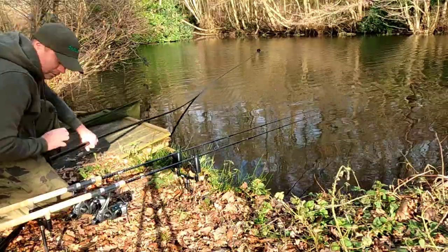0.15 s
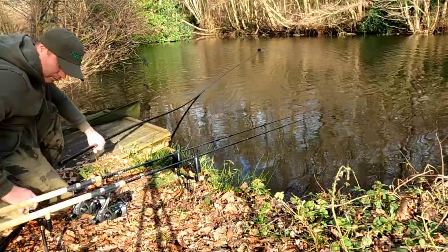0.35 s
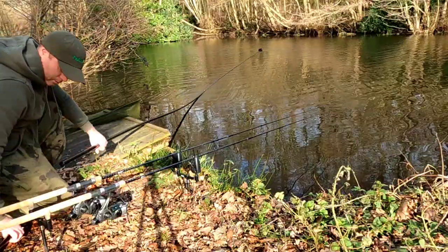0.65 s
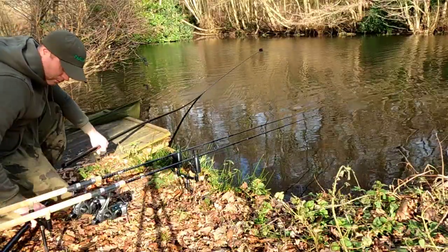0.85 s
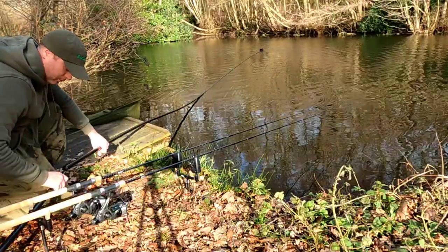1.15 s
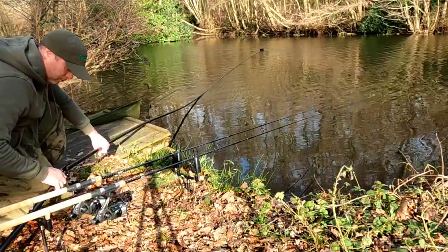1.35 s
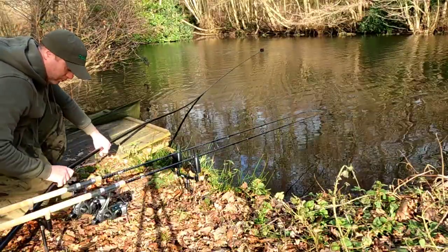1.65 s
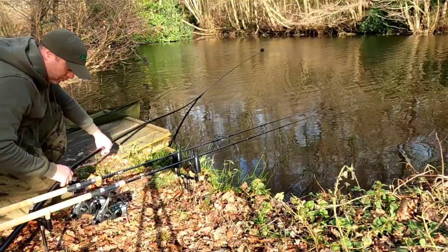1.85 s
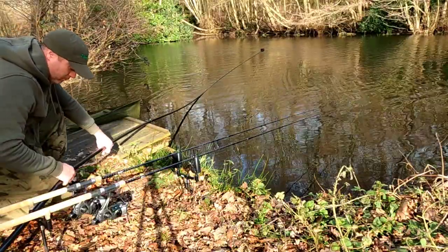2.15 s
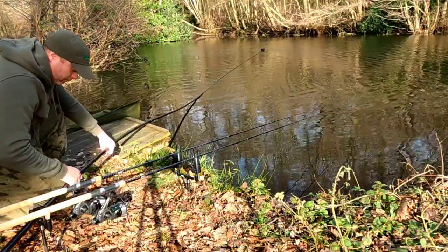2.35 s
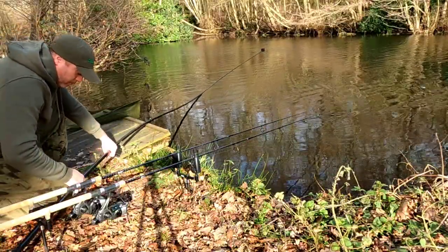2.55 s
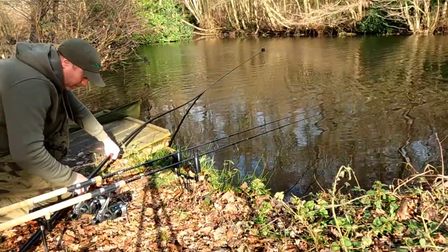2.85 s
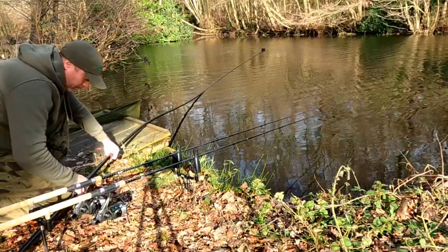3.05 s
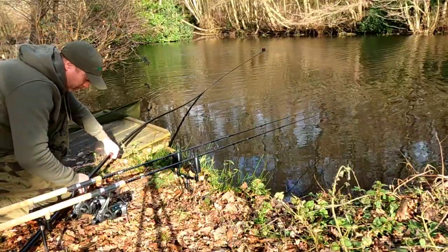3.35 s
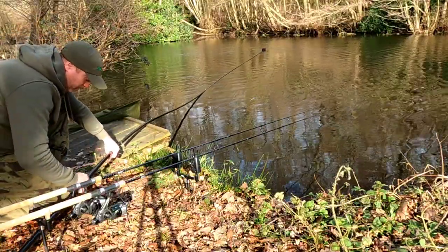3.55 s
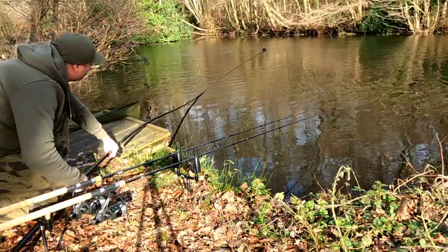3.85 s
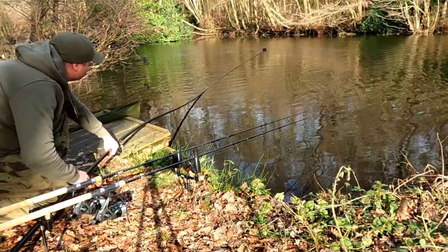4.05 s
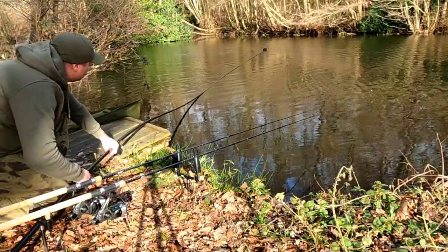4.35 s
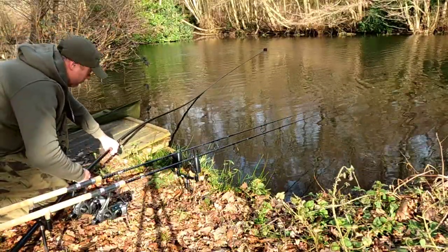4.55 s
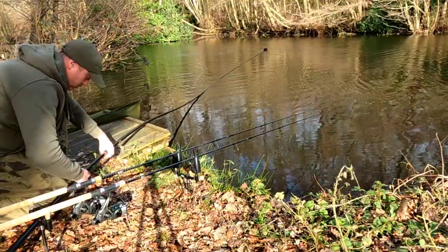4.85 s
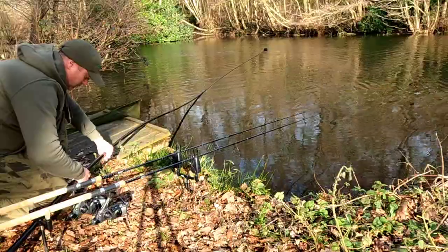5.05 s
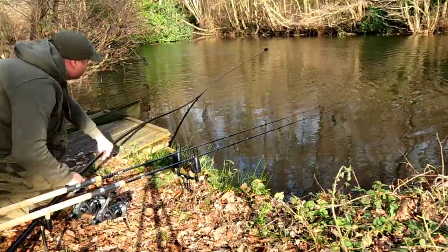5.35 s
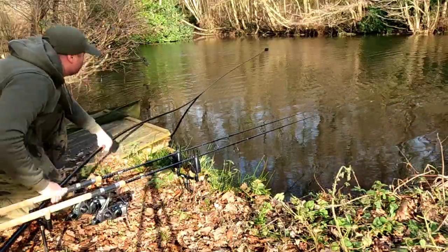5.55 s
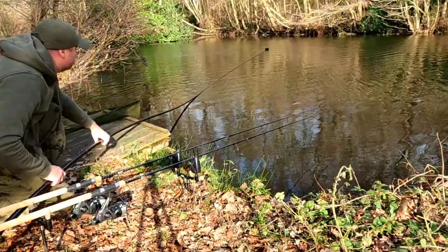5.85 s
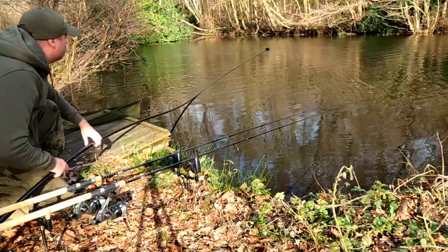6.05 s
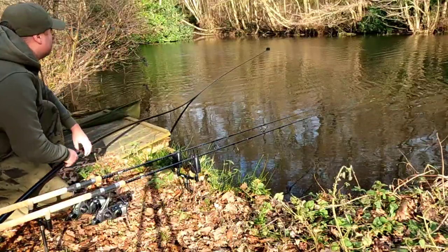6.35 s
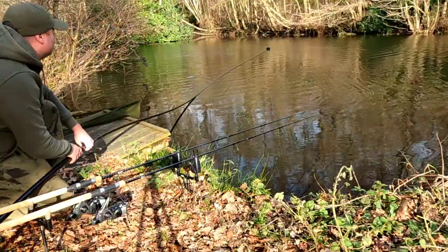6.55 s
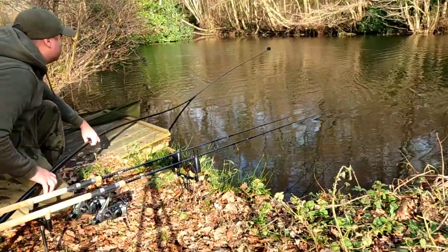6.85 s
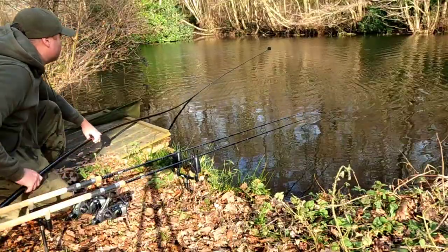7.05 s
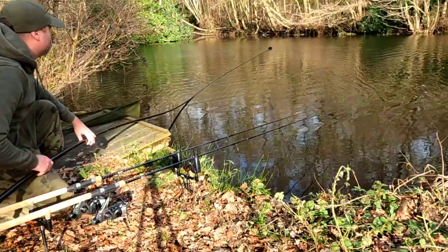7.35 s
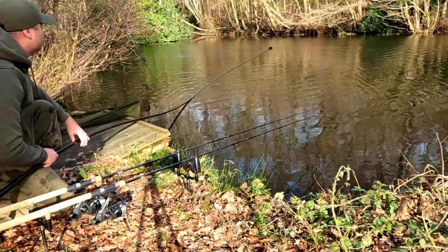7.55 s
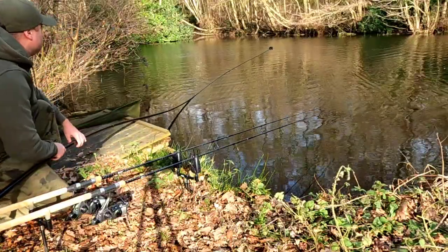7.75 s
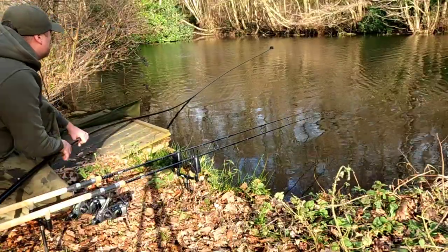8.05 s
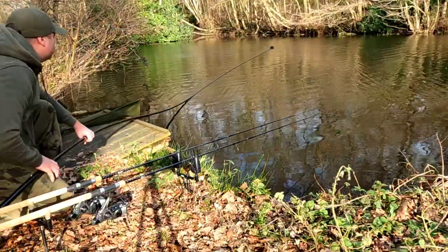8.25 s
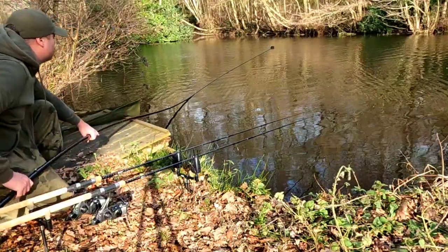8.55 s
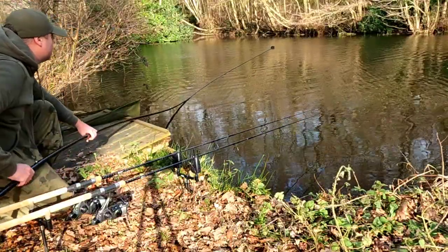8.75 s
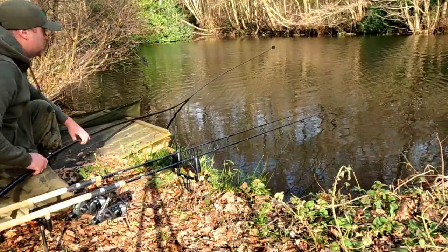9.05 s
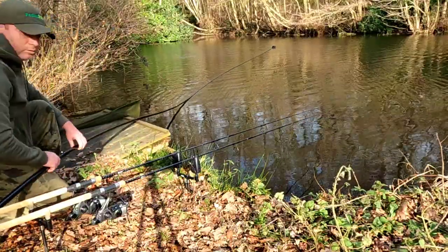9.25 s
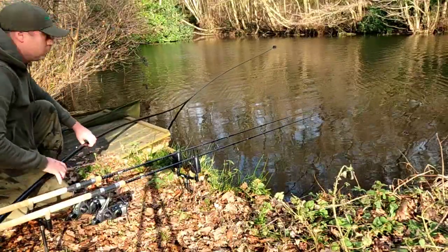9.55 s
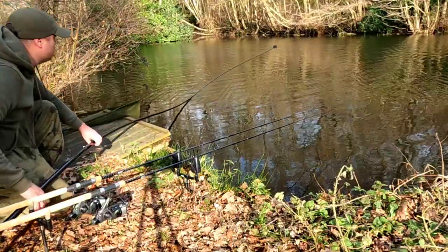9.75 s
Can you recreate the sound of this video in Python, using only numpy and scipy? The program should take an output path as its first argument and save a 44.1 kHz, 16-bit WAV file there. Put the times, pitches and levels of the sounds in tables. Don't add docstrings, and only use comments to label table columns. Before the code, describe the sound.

A close handling scene on a lake bank: soft fabric rustle and tiny dry snaps, then several hard hollow knocks and a brief crunch as a pole is set. High birds chirp downward in short series, near at first, later distant and echoing. Bassy wind flutter bumps the unshielded microphone, strongest after six seconds, over smooth distant hiss.

```python
import sys
import numpy as np
from scipy import signal
from scipy.fft import rfft, irfft, next_fast_len
from scipy.io import wavfile
from scipy.ndimage import uniform_filter1d, map_coordinates

SR = 44100
rng = np.random.default_rng(int(sys.argv[2]) if len(sys.argv) > 2 else 0)


def put_to_file(sound):
    columns = np.atleast_2d(sound).T
    safe = np.clip(columns, -1, 1)
    whole_steps = np.round(safe * 32767)
    wavfile.write(sys.argv[1], SR, whole_steps.astype(np.int16))


def gain_from_decibels(decibels):
    exponent = np.asarray(decibels, float) / 20
    return 10 ** exponent


N = 437031


def unit(x):
    return x / np.sqrt(np.mean(x ** 2) + 1e-20)


def curves(rows):
    seconds, *columns = np.transpose(rows)
    return [np.interp(np.arange(N) / SR, seconds, column) for column in columns]


def wobble(rate):
    points = rng.standard_normal(int(N * rate / SR) + 4)
    return map_coordinates(points, [np.arange(N) * rate / SR])


def coloured(x, spectrum):
    size = next_fast_len(N + 8192)
    hz, db = np.transpose(spectrum)
    log_hz = np.log(np.fft.rfftfreq(size, 1 / SR) + 0.26)
    gain = gain_from_decibels(np.interp(log_hz, np.log(hz), db))
    return unit(irfft(rfft(x, size) * gain, size)[:N])


def band(x, low_hz, high_hz, order=2):
    return signal.sosfilt(signal.butter(order, [low_hz, high_hz], "band", fs=SR, output="sos"), x)


def add(track, s, sound):
    part = track[round(s * SR):][:len(sound)]
    part += sound[:len(part)]


def decay(t, t60, rise_s):
    return gain_from_decibels(-60 * t / t60) * (1 - np.exp(-t / rise_s))


# peak in seconds, half length in seconds, slow push in dB, flutter in dB.
GUSTS = [(0.526, 0.08, -29, -54.5), (1.115, 0.14, -30, -55), (1.706, 0.13, -27, -44.5),
         (1.943, 0.085, -27, -43), (2.294, 0.2, -25.5, -47), (2.747, 0.21, -34.5, -46.5),
         (3.018, 0.23, -33.5, -60), (3.497, 0.1, -37, -49), (3.74, 0.16, -32.5, -44.5),
         (3.98, 0.15, -26.5, -63), (4.394, 0.14, -44, -72), (5.255, 0.072, -35, -61),
         (5.556, 0.3, -36.5, -51.5), (5.912, 0.21, -23.5, -43.5), (6.115, 0.043, -31, -46),
         (6.406, .13, -19, -39.5), (6.765, 0.23, -24.5, -48), (7.163, 0.19, -26, -49),
         (7.497, 0.04, -19.5, -53), (7.703, 0.12, -23, -42), (7.966, 0.051, -20, -42),
         (8.13, 0.087, -24, -40), (8.565, 0.3, -34, -46.5), (8.86, 0.13, -21, -44.5),
         (9.04, 0.11, -25, -56), (9.314, 0.2, -37, -52), (9.764, 0.068, -25.5, -52)]
CALM_PUSH_DB, CALM_FLUTTER_DB = -43, -64


def gusts():
    t = np.arange(N) / SR
    power = np.outer(gain_from_decibels([CALM_PUSH_DB, CALM_FLUTTER_DB]) ** 2, np.ones(N))
    for s, half, *db in GUSTS:
        bell = np.exp(-2 * ((t - s) / half) ** 2)
        power += np.outer(gain_from_decibels(db) ** 2, bell)
    return np.sqrt(power)


# pitch in Hz, level in dB per Hz.
PUSH = [(1, 14.5), (3, 11), (9, 9.5), (18, -7), (26, -35), (40, -77.5), (80, -130)]
# pitch in Hz, level in dB per Hz.
FLUTTER = [(12, -37), (22, 0.5), (43, -12.5), (90, -28), (200, -50), (400, -99), (800, -130)]


def wind(top=0.27):
    push_gain, flutter_gain = gusts()
    heave = coloured(rng.standard_normal(N), PUSH)
    heave_size = np.sqrt(np.abs(uniform_filter1d(heave ** 2, size=SR // 5)))
    push = push_gain * unit(heave / (0.5 + heave_size))
    lumps = gain_from_decibels(0.9 * wobble(6.6))
    flutter = flutter_gain * unit(lumps * coloured(rng.standard_normal(N), FLUTTER))
    return top * np.tanh(push / top) + flutter


# time in seconds, level in dB.
DRIFT = [(0, -54), (3.4, -53.5), (5, -54.5), (9.91, -55)]
# pitch in Hz, level in dB per Hz.
FAR = [(29, -49), (50, -0.5), (54, -11.5), (65, -6), (244, -12.5), (325, -13.5), (652, -9.5), (957, -12.5),
       (2330, -22.5), (3420, -22.5), (4450, -35.5), (5930, -30.5), (9360, -48), (14400, -48.5),
       (15500, -45)]


def distance():
    level_db, = curves(DRIFT)
    breathing_db = 0.3 * wobble(3.5)
    return gain_from_decibels(level_db + 1.5 + breathing_db) * coloured(rng.standard_normal(N), FAR)


# start in seconds, length in seconds, level, body and sheen in dB.
RUBBING = [(0.714, 0.67, -76.5, 4, 1), (0.94, 0.55, -62, -2.5, -2), (1.454, .17, -67, 0, -2),
           (1.71, 0.14, -68, -3, -6), (1.8, 1.4, -73.5, -9, -16), (4.08, 0.12, -76, -3, -6),
           (5.38, 0.45, -70.5, -17, -2), (5.62, 0.36, -69, -5, -2), (6.16, 0.1, -71.5, -6, -4),
           (6.417, 0.46, -69, -12, -4), (6.9, 0.73, -76.5, -12, -2), (7.58, 0.34, -68, -9, -2),
           (7.878, 0.11, -68, -11, -3), (8.25, 0.37, -76, -8, 2), (9.03, .2, -68.5, -8, 2),
           (9.2, .9, -74.5, -8, 1)]
# level, body and sheen in dB.
GRIP = (-76, -9, 2.5)
STROKE_FADE = 0.75


def strokes():
    def powers(db, body_db, sheen_db):
        return gain_from_decibels([db, db + body_db, db + sheen_db]) ** 2

    power = np.outer(powers(*GRIP), np.ones(N))
    for s, length, *levels in RUBBING:
        speed = signal.windows.tukey(int(length * SR), STROKE_FADE)
        for layer, gain in zip(power, powers(*levels)):
            add(layer, s, gain * speed ** 2)
    return np.sqrt(power)


# pitch in Hz, level in dB per Hz.
CLOTH = [(900, -49), (2000, -9), (3400, -4), (4500, -14), (6000, 1), (7600, -2.5), (9600, -14.5),
         (12000, -17), (15500, -26)]


def rubbing(density=0.2):
    middle, body, sheen = strokes()
    slips = rng.standard_normal(N) * (rng.random(N) < density)
    clumps = gain_from_decibels(1.3 * wobble(50) + 1.2 * wobble(250))
    hiss = coloured(slips, CLOTH) * clumps
    layers = middle * band(hiss, 4850, 9130, order=3)
    layers += body * gain_from_decibels(7.0) * band(hiss, 900, 4050, order=3)
    layers += sheen * band(hiss, 8530, 15600, order=3)
    return gain_from_decibels(4.0) * layers


def sing(track, s, pitch, level, waver, echo_db, t60):
    t = np.arange(SR // 2) / SR
    knots = rng.standard_normal((2, 40))
    shake, flicker = (map_coordinates(k, [np.arange(len(pitch)) * 110 / SR]) for k in knots)
    shaken_hz = pitch * (1 + 0.0049 * waver * shake)
    note = level * np.sin(2 * np.pi * np.cumsum(shaken_hz) / SR)
    tail = rng.standard_normal(len(t)) * decay(t, t60, 0.0053)
    add(track, s, note * gain_from_decibels(2.0 * waver * flicker))
    add(track, s, gain_from_decibels(echo_db) * signal.fftconvolve(note, tail / np.linalg.norm(tail)))


def birds(notes, gain_db, bend, swell, waver, echo_db, t60):
    track = np.zeros(N)
    for s, length, start_hz, end_hz, db in notes:
        u = np.linspace(0, 1, int(length * SR) + 8)
        pitch = end_hz + (start_hz - end_hz) * (1 - u) ** bend
        envelope = np.clip(np.sin(np.pi * u ** swell), 0, 1) ** 0.34
        sing(track, s, pitch, gain_from_decibels(db + gain_db) * envelope, waver, echo_db, t60)
    return track


# start in seconds, length in seconds, start pitch in Hz, end pitch in Hz, level in dB.
OTHERS = [(.231, 0.026, 5750, 5920, -81), (.381, 0.052, 6480, 6050, -76), (.589, 0.047, 6500, 6100, -73),
          (1.563, 0.056, 7430, 6850, -71), (1.745, 0.051, 7270, 6760, -75), (1.901, 0.055, 6800, 7040, -72),
          (2.078, .049, 6920, 6700, -78), (2.442, .037, 7060, 6780, -78), (2.637, 0.043, 7100, 6750, -74),
          (4.31, .109, 8470, 8500, -87), (4.396, .092, 8260, 8100, -87), (4.545, 0.09, 8000, 7000, -79),
          (7.005, 0.079, 3360, 3394, -74), (7.128, 0.029, 3260, 3870, -66.5),
          (7.175, 0.037, 3830, 3720, -66), (7.249, .156, 8530, 8240, -84), (7.352, 0.079, 4270, 4000, -74),
          (8.122, 0.035, 6300, 5930, -73), (9.31, .23, 8170, 7140, -87)]


def other_birds():
    return birds(OTHERS, gain_db=9.5, bend=1.2, swell=1.0, waver=1.57, echo_db=-5.5, t60=0.44)


# time in seconds, peak in dB, centre pitch in Hz.
SNAPS = [(0.9194, -51, 6680), (1.073, -53, 6890), (1.1917, -44, 6880), (1.2307, -43, 6790),
         (1.292, -43, 6750), (1.4073, -41.5, 6400), (1.5664, -50, 7260), (1.775, -51, 7110),
         (3.2064, -58, 8310), (4.1275, -55, 7100), (4.6084, -42.5, 6700), (4.8294, -51, 7600),
         (4.951, -43, 7030), (5.6516, -60, 7910), (5.9908, -54, 6790), (6.448, -46, 6950),
         (6.4941, -49, 6650), (6.538, -47, 6930), (6.5794, -48, 6940), (6.6159, -55, 8280),
         (6.6667, -42, 6700), (6.7421, -56, 6600), (6.8447, -45, 6700), (7.8394, -49.5, 7840),
         (7.935, -48, 6830), (8.8947, -53, 8120), (8.9815, -50, 7960), (9.1716, -52, 6680),
         (9.437, -60, 6990), (9.5113, -48, 7190)]


def snaps(t60=0.0022):
    track, t = np.zeros(N), np.arange(SR // 50) / SR
    for s, db, hz in SNAPS:
        puff = rng.standard_normal(len(t)) * decay(t, t60, 0.00022)
        burst = band(puff, hz / 1.1, hz * 1.28)
        add(track, s, gain_from_decibels(db + 1.5) * burst / np.abs(burst).max())
    return track


# start in seconds, length in seconds, start pitch in Hz, end pitch in Hz, level in dB.
NEAR = [
    (1.626, .05, 6330, 5300, -58),
    (1.787, 0.049, 6150, 5200, -56.5),
    (1.95, 0.047, 6200, 5190, -54.5),
    (2.112, 0.06, 6250, 4980, -53.5),
    (2.284, 0.081, 6300, 5050, -58),
    (2.412, 0.088, 6150, 5120, -59.5),
    (2.486, 0.069, 6100, 5040, -56),
    (2.683, 0.066, 6050, 5010, -56),
]


def nearest_bird():
    return birds(NEAR, gain_db=2.5, bend=1.95, swell=1.2, waver=1.5, echo_db=-2, t60=0.7)


# start in seconds, length in seconds, start pitch in Hz, end pitch in Hz, level in dB.
HAZY = [(1.93, 0.054, 8300, 7900, -76), (2.12, .07, 8600, 7700, -83), (2.29, .06, 8600, 7700, -88),
        (2.572, 0.06, 5700, 5210, -62), (2.55, .07, 8800, 8400, -79), (2.85, .08, 8500, 8250, -82),
        (5.35, 0.17, 8700, 7200, -73.5), (5.53, .13, 7800, 7500, -73), (5.86, .087, 5370, 5130, -69),
        (5.95, .081, 5600, 5090, -66), (6.04, 0.12, 5470, 5050, -72), (9.12, .03, 6500, 6200, -80),
        (9.23, .13, 2500, 2290, -67.5), (9.526, 0.061, 5890, 5240, -65.5), (9.69, 0.081, 5800, 5330, -65),
        (9.83, .065, 5460, 5320, -73)]


def hazy_birds():
    return birds(HAZY, gain_db=-10, bend=1.3, swell=0.9, waver=3.5, echo_db=13, t60=0.5)


# time in seconds, peak in dB, pitch in Hz, sharpness, crack in dB.
KNOCKS = [
    (2.136, -37.5, 3120, 4.7, -16),
    (2.999, -32, 3140, 6, -14),
    (3.229, -33, 2800, 2.5, -26),
    (3.5203, -29, 2890, 1.54, -20),
    (5.8326, -47, 2190, 4, -20),
    (6.026, -45, 3800, 2, -5),
    (7.236, -48, 4900, 4, -14),
    (9.596, -47, 3400, 3.5, -8),
    (9.7772, -38.5, 3680, 4.9, 1),
    (9.782, -45, 2100, 8.4, -30),
]


def knocks(t60=0.0082):
    track, t = np.zeros(N), np.arange(SR // 20) / SR
    for s, db, hz, sharpness, crack_db in KNOCKS:
        puff = rng.standard_normal((2, len(t))) * decay(t, t60, 0.00051)
        spread = 1 + 1 / sharpness
        ring = band(puff[0], hz / spread, hz * spread)
        crack = band(puff[1], 4800, 9500, order=3)
        blow = ring / np.abs(ring).max() + gain_from_decibels(crack_db + 1.0) * crack / np.abs(crack).max()
        add(track, s, gain_from_decibels(db) * blow)
    return track


def shadow(x, notch_hz=4300, width_hz=700, depth=0.6):
    b, a = signal.iirpeak(notch_hz, notch_hz / width_hz, fs=SR)
    return band(x - depth * signal.lfilter(b, a, x), 870, 7300)


# start in seconds, length in seconds, start pitch in Hz, end pitch in Hz, level in dB.
SLURS = [
    (2.585, 0.15, 8100, 7320, -68),
    (2.812, 0.19, 8400, 6960, -68.5),
]


def slurring_bird():
    return birds(SLURS, gain_db=0, bend=3, swell=1.2, waver=1.5, echo_db=1, t60=0.6)


# start in seconds, length in seconds, level in dB.
CRUNCH = [
    (3.002, .022, -60),
    (3.22, .038, -49.5),
]
# pitch in Hz, level in dB.
POLE = [(1200, -15), (2130, -6), (2730, -1), (3340, -6), (4300, -12), (4800, -7), (5790, -6), (7000, -25),
        (9000, -26), (12000, -60), (16000, -90)]


def crunch():
    grains = rng.standard_normal(N) * (rng.random(N) < 0.07)
    grit, track = coloured(grains, POLE), np.zeros(N)
    for s, length, db in CRUNCH:
        window = signal.windows.tukey(int(length * SR), 0.4)
        add(track, s, gain_from_decibels(db) * window * grit[round(s * SR):][:len(window)])
    return track


# start in seconds, length in seconds, start pitch in Hz, end pitch in Hz, level in dB.
STEPPED = [
    (3.021, .034, 6150, 5000, -57),
    (3.062, .06, 5500, 5050, -57.6),
    (3.197, .028, 6100, 5000, -57.4),
    (3.228, .068, 5400, 4600, -57.5),
]


def stepping_bird():
    return birds(STEPPED, gain_db=2.5, bend=0.28, swell=0.9, waver=1.1, echo_db=-4, t60=0.7)


# time in seconds, peak in dB.
CLACK = (3.5208, -30)
# pitch in Hz, level in dB, time to fade by 60 dB in seconds.
TUBE = [(2110, -4, 0.018), (2750, -3, 0.017), (3360, 6, 0.008), (4680, -3, 0.01), (5740, -8, 0.01),
        (8300, -25, .012)]


def clack():
    track, t = np.zeros(N), np.arange(SR // 20) / SR
    ring = np.zeros(len(t))
    for hz, db, t60 in TUBE:
        ring += gain_from_decibels(db - 60 * t / t60) * np.sin(2 * np.pi * (hz * t + rng.random()))
    s, peak_db = CLACK
    add(track, s, gain_from_decibels(peak_db) * (1 - np.exp(-t / 0.00042)) * ring)
    return track


# start in seconds, length in seconds, start pitch in Hz, level in dB.
FLOCK = [
    (4.009, .124, 6050, -74),
    (4.743, 0.057, 6000, -66),
    (4.9, .06, 5530, -66.5),
    (4.993, 0.074, 6030, -65.5),
    (5.128, .081, 5720, -69),
    (5.789, .045, 5850, -66),
    (7.834, 0.064, 5650, -66),
    (7.963, 0.074, 5520, -66),
    (8.074, 0.083, 6050, -66),
    (8.204, 0.089, 6020, -65.5),
]
FLOCK_END_HZ = 5020


def far_flock():
    whistles = [(s, length, hz, FLOCK_END_HZ, db) for s, length, hz, db in FLOCK]
    return birds(whistles, gain_db=0, bend=1.25, swell=0.9, waver=1.4, echo_db=2, t60=0.65)


def scene():
    singers = nearest_bird() + stepping_bird() + slurring_bird()
    singers += far_flock() + other_birds() + hazy_birds()
    pole = rubbing() + shadow(knocks() + snaps()) + crunch() + clack()
    return (singers + wind() + distance() + pole)[None]


def low_pass(x):
    return signal.sosfilt(signal.butter(12, 15510, fs=SR, output="sos"), x)


def record(dry):
    top_hz = 15510
    kept = irfft(rfft(dry) * (np.fft.rfftfreq(N, 1 / SR) < top_hz), N)
    return low_pass(kept)


dry = scene()
out = record(dry)
put_to_file(out)
```